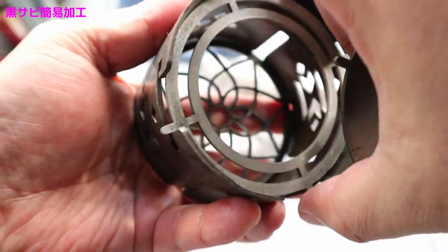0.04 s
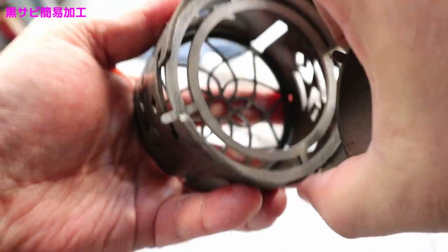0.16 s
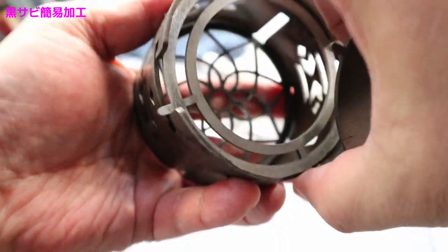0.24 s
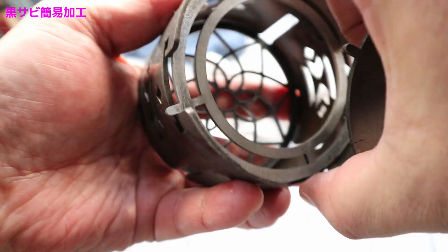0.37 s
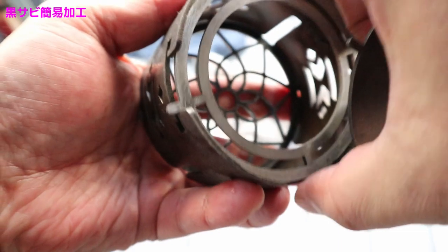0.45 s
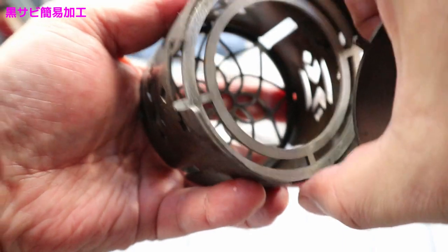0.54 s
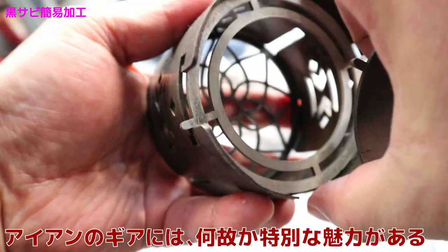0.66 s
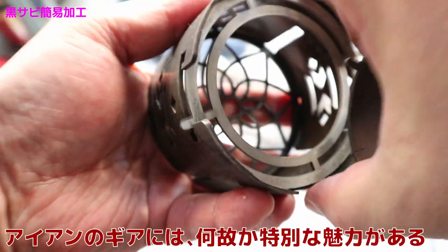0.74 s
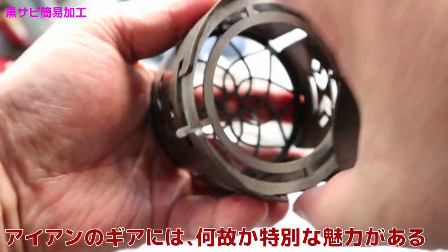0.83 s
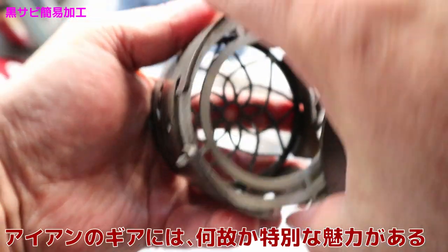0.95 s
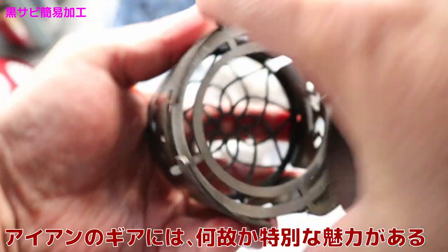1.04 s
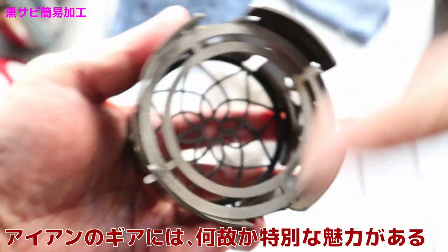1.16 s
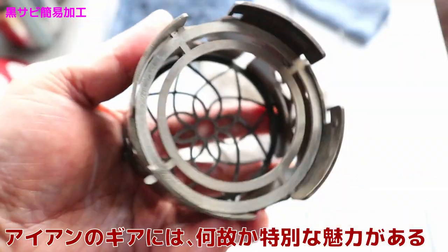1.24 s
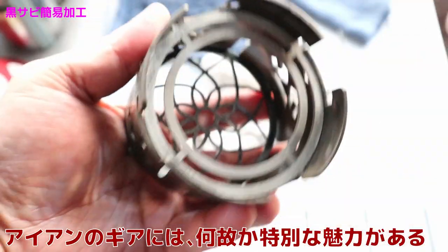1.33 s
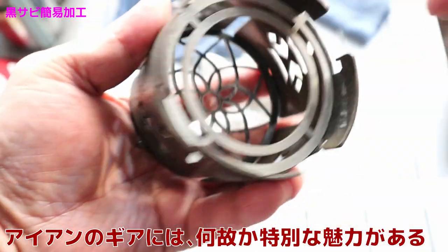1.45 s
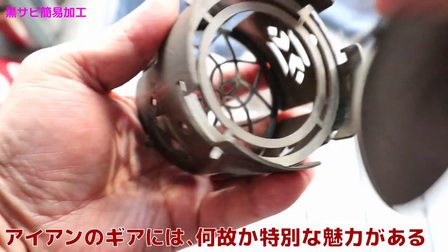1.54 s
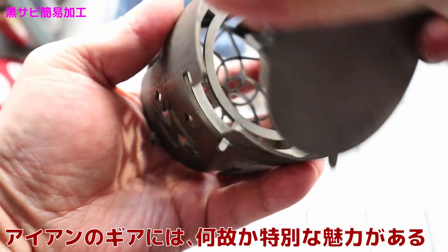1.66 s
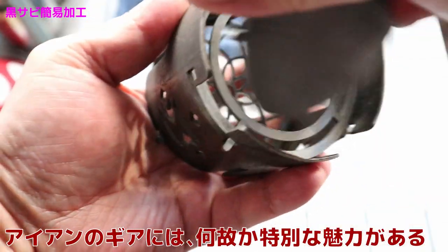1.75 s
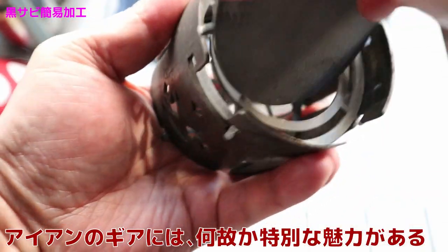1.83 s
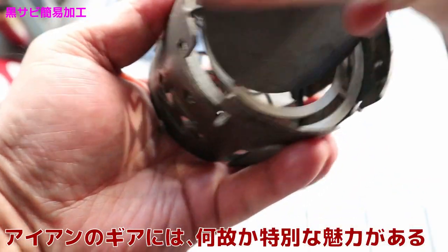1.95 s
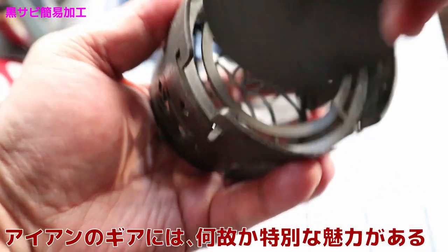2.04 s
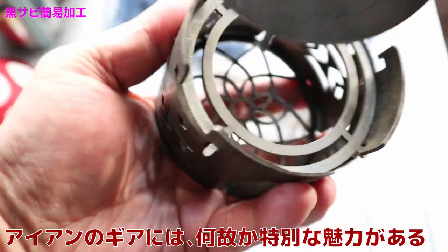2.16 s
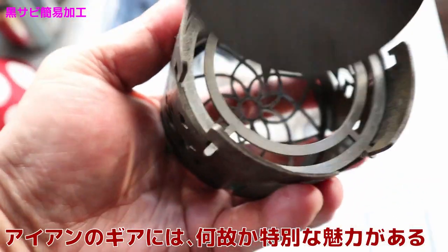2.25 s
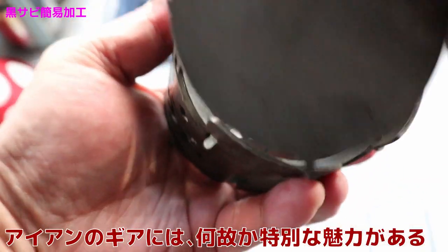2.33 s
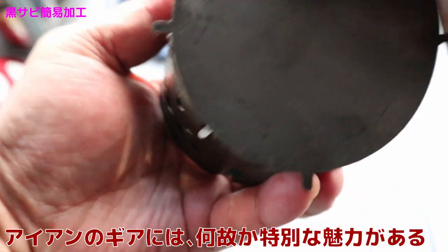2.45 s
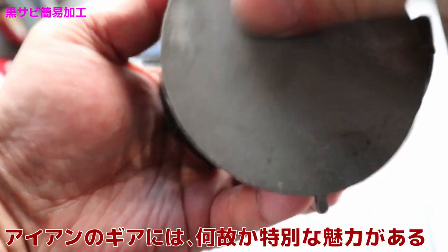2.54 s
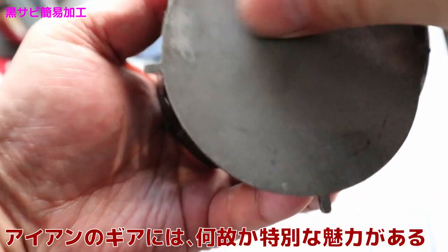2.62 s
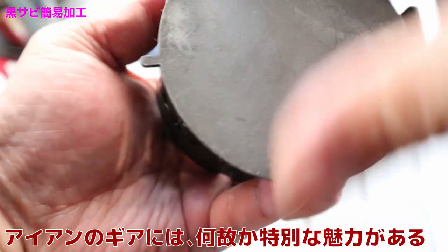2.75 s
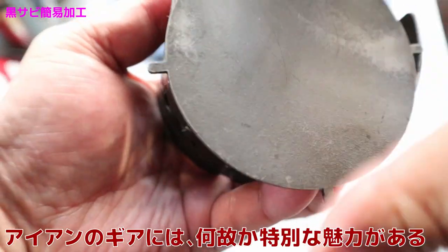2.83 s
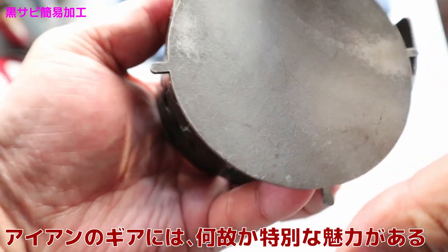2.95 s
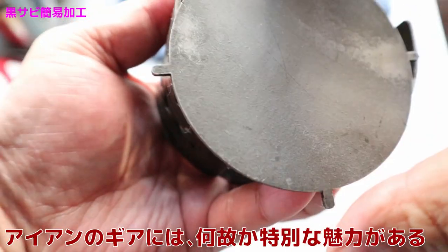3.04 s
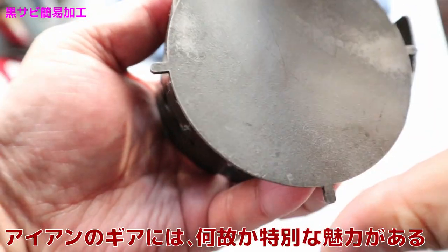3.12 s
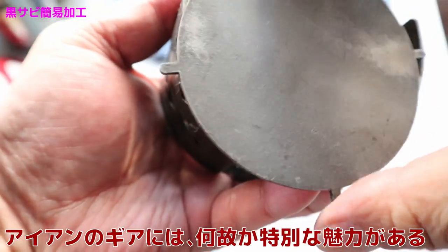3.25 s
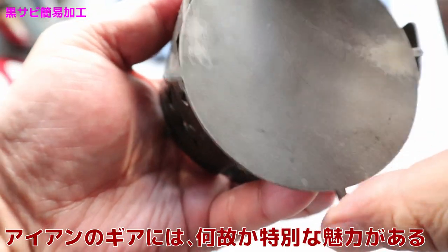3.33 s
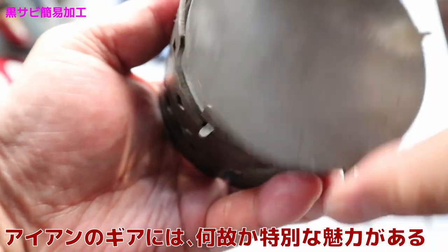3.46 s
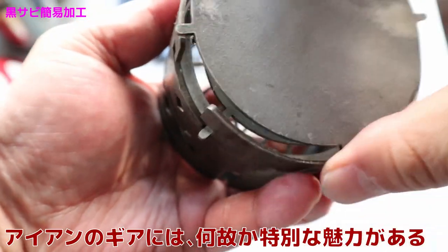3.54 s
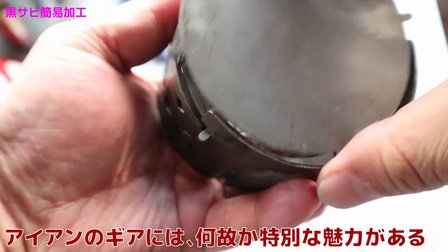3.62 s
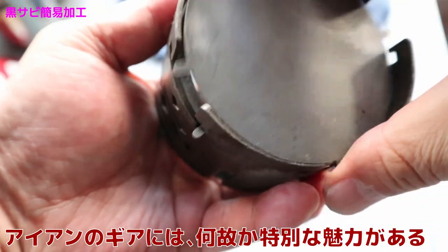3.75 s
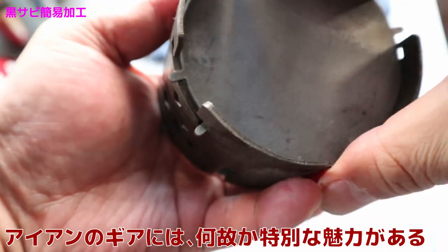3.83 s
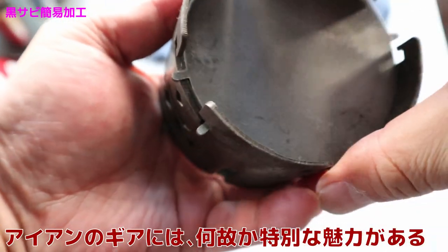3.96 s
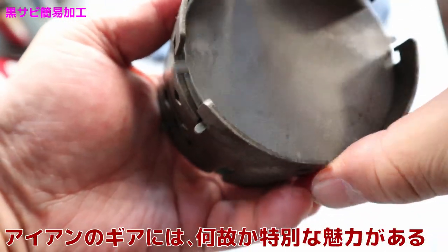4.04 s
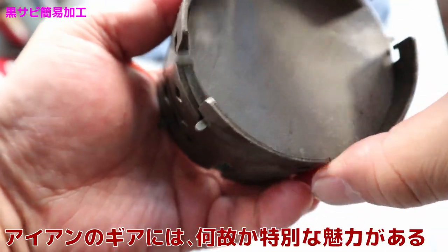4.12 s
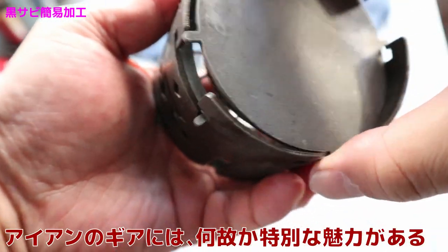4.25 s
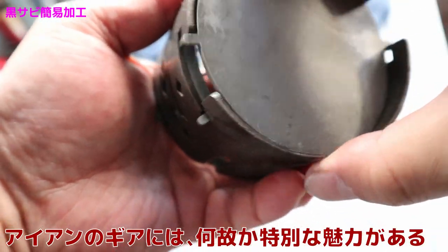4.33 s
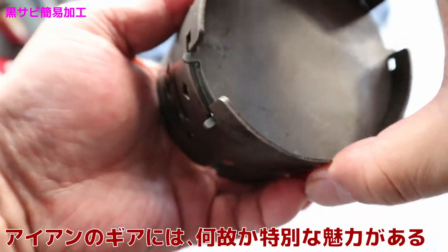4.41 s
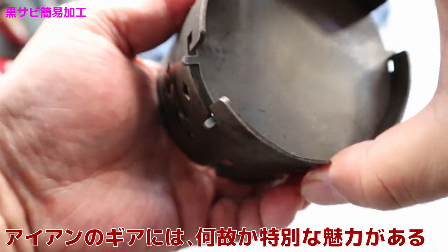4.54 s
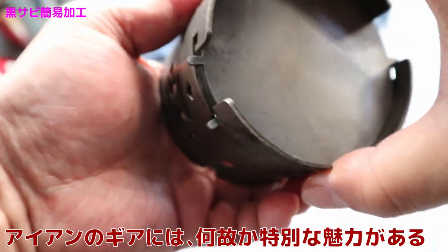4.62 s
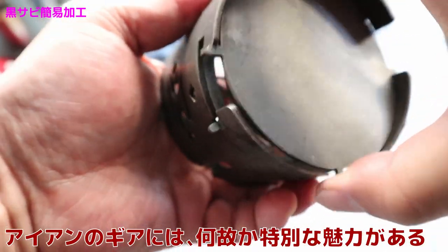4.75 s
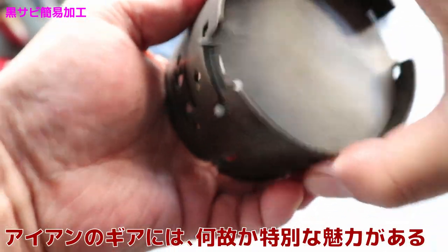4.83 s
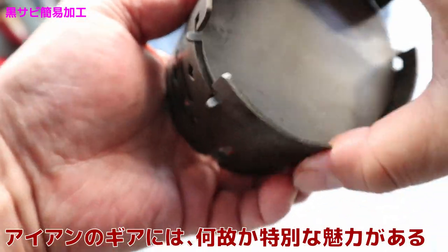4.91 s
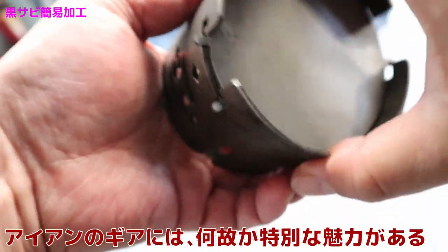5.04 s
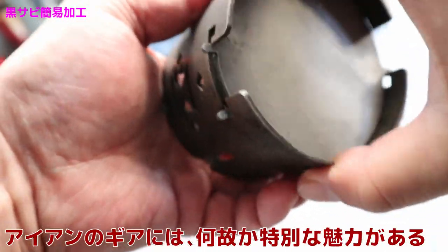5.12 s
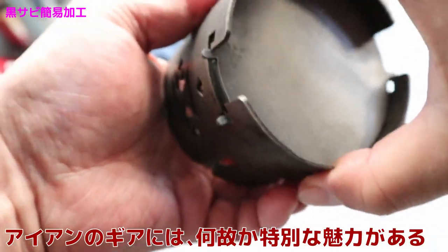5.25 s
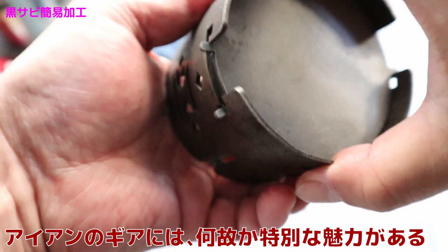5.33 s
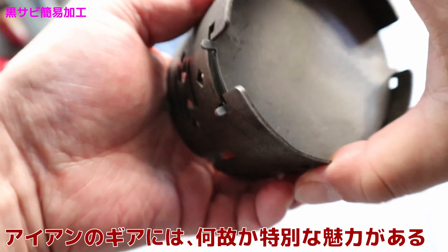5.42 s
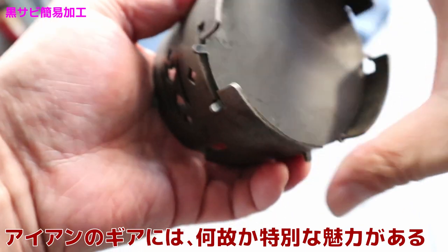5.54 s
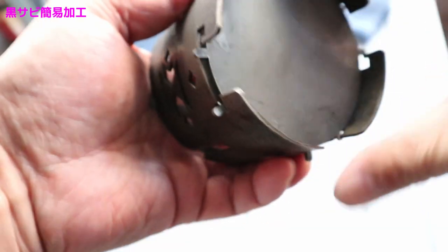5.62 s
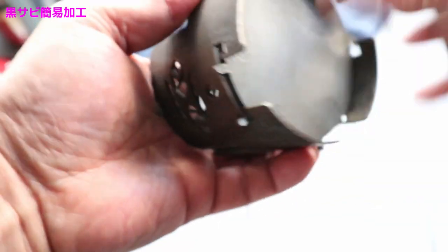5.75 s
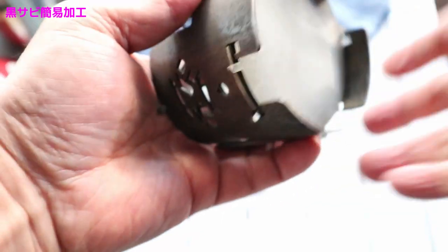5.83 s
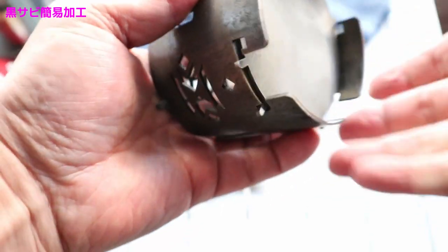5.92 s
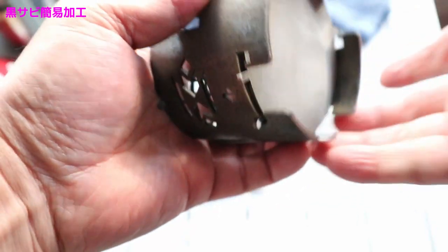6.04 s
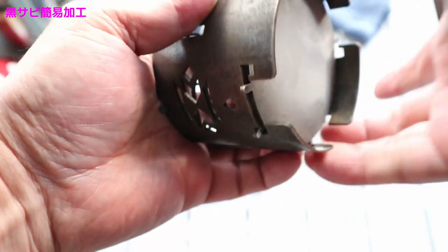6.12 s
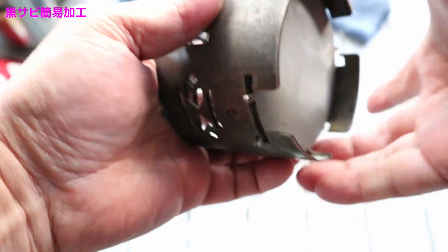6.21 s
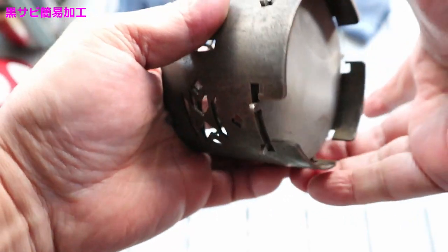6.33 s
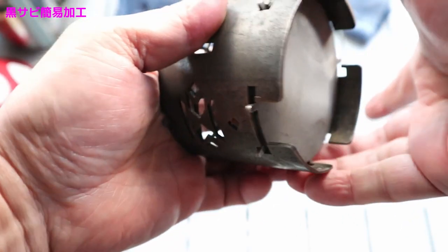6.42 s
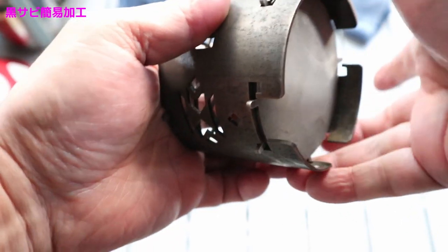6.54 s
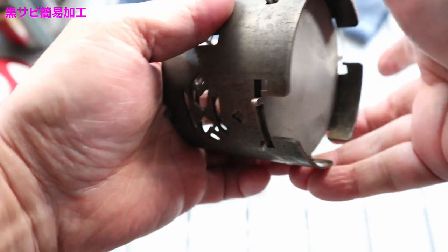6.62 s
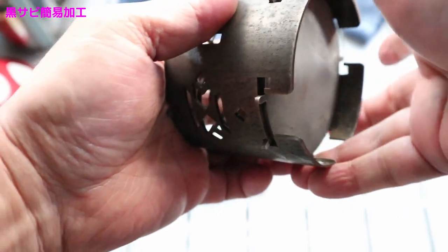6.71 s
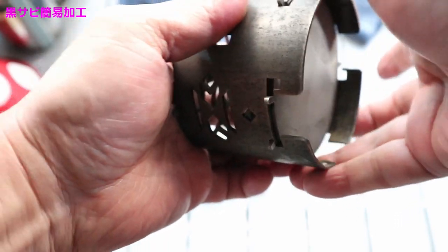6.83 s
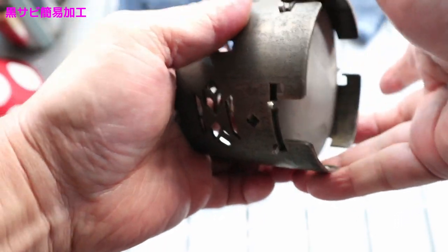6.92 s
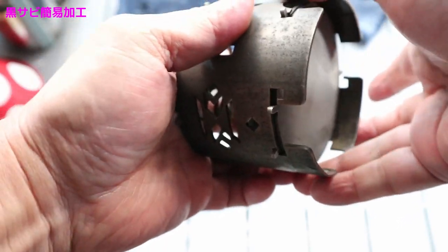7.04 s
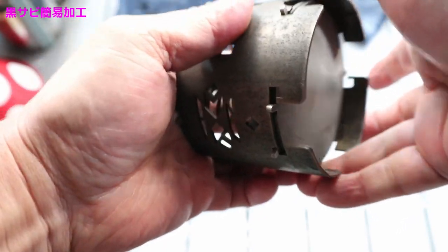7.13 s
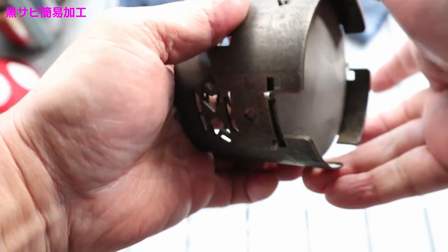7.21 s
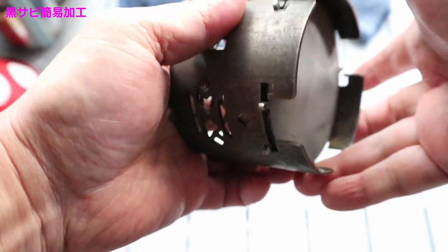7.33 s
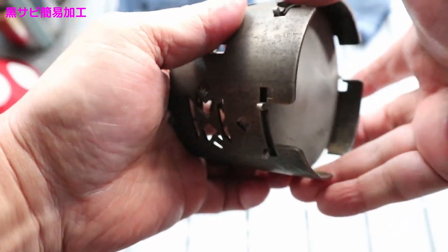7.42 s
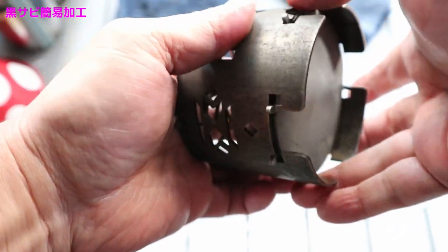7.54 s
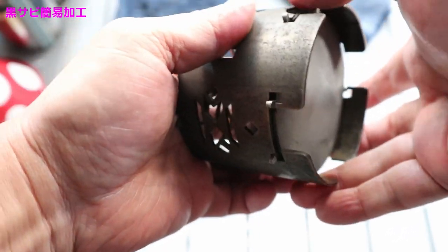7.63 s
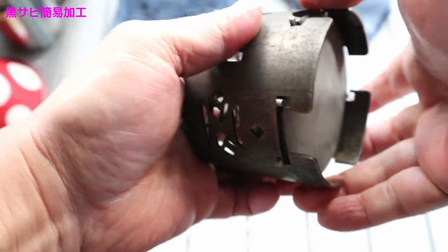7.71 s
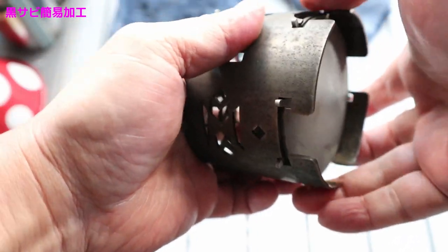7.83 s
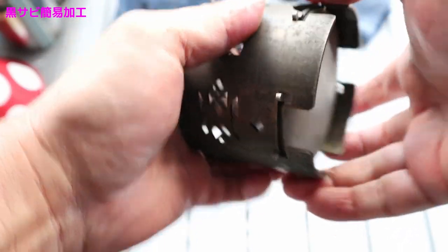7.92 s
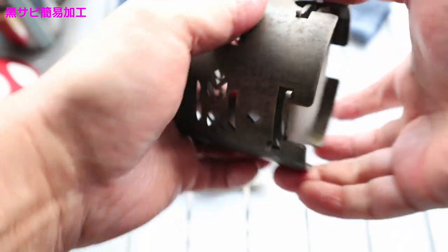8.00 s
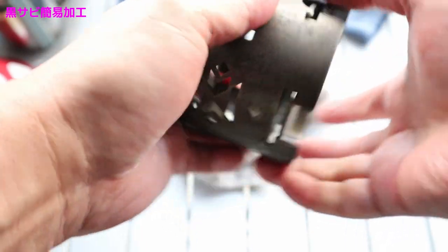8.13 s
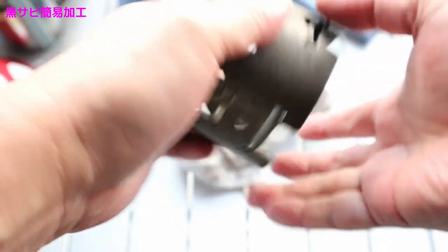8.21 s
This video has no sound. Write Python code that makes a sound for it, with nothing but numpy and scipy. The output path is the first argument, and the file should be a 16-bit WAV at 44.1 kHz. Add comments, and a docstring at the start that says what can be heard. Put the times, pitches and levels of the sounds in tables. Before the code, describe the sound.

Close stereo microphone in a small room, metal slightly right of centre. Faint gritty scraping, then a sharp bright clack as a small plate leaves an iron cylinder. A disc touches the rim with short rings, then lands in a loud double clank. Uneven ticks, knocks and little scrapes follow as it is pushed into slots, growing sparse. Steady low room noise lies underneath.

```python
"""A small room, with thin iron plates handled close to a two-port microphone, a little to its right.
A small plate is pulled off a cylindrical iron shell; then a round disc is set on the rim, drops,
and is pushed and rocked into its slots. Noise bursts shaped by the shell make knocks and scrapes.
Free plates ring briefly as dying sines; plates held by the fingers only tick and scrape.
Near echoes, a short room tail and a steady low background lie around them."""
import sys
import numpy as np
from scipy import signal
from scipy.fft import rfft, irfft, next_fast_len
from scipy.io import wavfile

SR = 44100
rng = np.random.default_rng(int(sys.argv[2]) if len(sys.argv) > 2 else 0)


def generate_wav(sig):
    """Save sig (samples, or channels by samples) to the path in sys.argv[1] as 16-bit PCM at SR."""
    pcm = np.round(np.clip(np.atleast_2d(sig).T, -1, 1) * 32767).astype(np.int16)
    wavfile.write(sys.argv[1], SR, pcm)


N = 364701

# modes of the shell's free rim, which ring along with either plate: f/Hz, level/dB, decay time/ring t60
RIM = [(1216, -22, 1.0), (1514, -10.5, .8), (1600, -9.5, 0.57), (2160, -12.5, 1.3), (2393, -11, 1.3),
       (3010, -15.5, 0.72), (3290, -12.5, 0.68), (3830, -21, 0.3), (5920, -15, 1.5)]


def amp(db):
    """Decibels to gain."""
    return 10 ** (np.asarray(db) / 20)


def unit(x):
    """Scales to rms 1."""
    return x / np.sqrt(np.mean(x ** 2) + 1e-20)


def read(points, hz):
    """Reads (f/Hz, value) points on a log-frequency axis."""
    f, value = np.transpose(points)
    return np.interp(np.log(hz + 1), np.log(f + 1), value)


def add(mix, s, sound):
    """Adds a sound at time s, or at the start if s is negative."""
    part = mix[:, max(round(s * SR), 0):][:, :sound.shape[-1]]
    part += sound[..., :part.shape[1]]


def lean(pan_db):
    """Left and right gains of equal total power, pan_db apart."""
    gains = amp([pan_db / 2, -pan_db / 2]).reshape(2, -1)
    return gains / np.sqrt((gains ** 2).mean(0))


def background(whine_hz=2740, whine_width_hz=130, whine_db=9, level_db=-52.5):
    """Steady low room noise, nearly mono in the bass, with a faint fuzzy whine."""
    # spectrum of the background: f/Hz, density/dB per Hz
    floor_spectrum = [(12, -28), (30, -9), (62, -3.5), (120, -9), (310, -12), (550, -17), (1170, -24.5),
                      (2000, -26.5), (3300, -33.5), (8160, -42), (15000, -72.5)]
    # how alike the two ports hear it: f/Hz, left-right correlation
    likeness = [(50, 1), (125, 0.89), (300, 0.47), (1000, .4), (4000, 0.068)]
    hz = np.fft.rfftfreq(N, 1 / SR)
    left, other = rfft(rng.standard_normal((2, N)))
    same = np.clip(read(likeness, hz), -1, 1)
    right = same * left + np.sqrt(1 - same ** 2) * other
    whine = whine_db / (1 + (2 * (hz - whine_hz) / whine_width_hz) ** 2)
    spectrum = np.array([left, right]) * amp(read(floor_spectrum, hz) + whine)
    return amp(level_db) * unit(irfft(spectrum, N))


def shell(force, low_db, upper_db, treble_db, point_db=2.5, ripple_hz=160, size=8192):
    """Passes a contact force through the palm-damped shell's causal response; the result has energy 1."""
    # spectrum of the shell damped by the palm: f/Hz, density/dB per Hz
    shell_spectrum = [(60, -33), (130, -24.5), (378, -8.5), (576, -18.5), (861, -6.5), (1350, -8),
                      (1730, 0.5), (2320, 0.5), (2870, -10.5), (5400, -19), (6500, -16), (9500, -17.5),
                      (12800, -30), (15500, -34)]
    # resonances that stand out of it: f/Hz, width/Hz, level/dB
    resonances = [(1485, 49, 4.4), (1630, 50, 3.2), (2100, 20, 2.5), (2520, 110, 3.6), (3006, 120, 3.9),
                  (3230, 180, 4), (5440, 120, 3.6), (9155, 260, 7.4)]
    hz = np.fft.rfftfreq(size, 1 / SR)
    tilt = [(1200, low_db), (1600, 0), (2700, 0), (3300, upper_db), (5800, upper_db), (7300, treble_db)]
    db = read(shell_spectrum, hz) + read(tilt, hz)
    for f, width, level in resonances:
        db = db + level / (1 + (2 * (hz - f) / width) ** 2)
    # every point of contact favours other resonances
    ripple = rng.standard_normal(size // 16)
    db = db + point_db * np.interp(hz / ripple_hz, np.arange(len(ripple)), ripple)
    # minimum phase: the response starts at once and rings only afterwards
    log_gain = np.log(amp(np.concatenate([db, db[-2:0:-1]])))
    response = np.fft.ifft(np.exp(np.conj(signal.hilbert(log_gain)))).real[:size // 4]
    sound = signal.fftconvolve(force, response[None], axes=1)
    return sound / np.sqrt((sound ** 2).sum() / 2)


def both_sides(force, apart=1.0, above_hz=3800):
    """The plates radiate treble unequally towards the two microphone ports."""
    other = force * rng.choice([-1, 1], len(force))
    other = apart * signal.lfilter(*signal.butter(1, min(above_hz, SR / 3), "high", fs=SR), other)
    return np.array([force + other, force - other])


def colour(db, bright_db):
    """Low, upper and treble dB: harder blows have less body; sharp edges lift upper band and treble."""
    low_db = 2.5 - 0.46 * (db + 30)  # under about 1.4 kHz, relative to a light touch at -30 dB
    upper_db = 1 + .52 * bright_db  # about 3-6.5 kHz
    return low_db, upper_db, -9 + bright_db


def contact(db, bright_db, chatter_s, first=1.0, bite_s=.0009, energy_s=0.006):
    """The edges touch, bite, and chatter on in a dying noise that shakes the shell."""
    t = np.arange(SR // 12) / SR
    chatter = np.exp(-np.log(1000) * t / max(chatter_s, .002))
    bite = 1 - np.exp(-t / bite_s)
    force = rng.standard_normal(len(t)) * chatter * bite
    force[0] = first
    # the energy is that of energy_s seconds at rms level db
    return amp(db) * np.sqrt(energy_s * SR) * shell(both_sides(force), *colour(db, bright_db))


def knock(knocks, s, db, bright_db, chatter_s):
    """The edges graze faintly just before they strike."""
    graze_lead_s, graze_db, graze_chatter_s = 0.0043, -26, .02
    add(knocks, s - graze_lead_s, contact(db + graze_db, bright_db, graze_chatter_s))
    add(knocks, s, contact(db, bright_db, chatter_s))


def damped(hz, db, t60, wobble_hz=0, length_s=.1, steps_per_s=250):
    """A dying sine that starts at rms level db; rattling against a neighbour makes its pitch wobble."""
    t = np.arange(round(length_s * SR)) / SR
    steps = rng.standard_normal(size=256)
    rattle = np.interp(t * steps_per_s, np.arange(len(steps)), steps)
    turns = hz * t + wobble_hz * np.cumsum(rattle) / SR
    return np.sqrt(2) * amp(db) * np.exp(-np.log(1000) * t / t60) * np.sin(2 * np.pi * turns)


def ring(s, ring_db, high_db, t60, lead_hz=None, scatter_db=1.0, free_t60=.24, stiffen=.0035, rattle=.0075):
    """Modes of plate and rim ring, one may lead; rings shorter than free_t60 are pressed, sharp and blurred."""
    # modes of the small plate: f/Hz, level/dB, decay time/ring t60
    small_plate = [(1520, -12, 0.59), (2000, -10, 2), (2160, -3, 1.9), (2930, 2, 0.77), (3120, 1.5, 0.81),
                   (3470, -2.5, 0.61), (4700, -13, 0.66), (5540, -12, 1.3), (5770, -5, 0.84),
                   (7260, -11.5, 1.6), (6960, -10, .9), (8740, -13.5, 0.92), (9534, -25, .85),
                   (10200, -12, 1.4), (11570, -12, 1.4), (13230, -14.5, 1.2), (15080, -16.5, .7)]
    # modes of the round disc: f/Hz, level/dB, decay time/ring t60
    disc = [(2017, -15, 0.63), (2376, 1.5, 0.79), (2383, -9.5, 0.97), (3390, -16.5, 2.2),
            (4480, -20.5, 1.6), (5452, -2, 1.22), (5490, -16, 0.53), (5830, -23.5, 1.2), (8760, -19, 2.6),
            (8800, -19.5, .8), (9760, -18, 1.3), (10400, -25.5, 1.0), (11900, -30.5, 1.2), (12700, -36, .9)]
    disc_from_s, high_modes_hz, other_modes_db = 1.6, 4000, -13.5
    plate = small_plate if s < disc_from_s else disc
    hz, db, hold = np.transpose(np.concatenate([plate, RIM]))
    db = db + other_modes_db + high_db * (hz > high_modes_hz)
    db = db + scatter_db * rng.standard_normal(len(hz))
    if lead_hz:
        db[np.argmin(abs(hz - lead_hz))] = 0
    # stiffen and rattle are shares of each mode's pitch
    pressed = max(free_t60 / t60 - 1, 0)
    hz = hz * (1 + stiffen * pressed * rng.uniform(0, 1.5, len(hz)))
    return sum(damped(f, ring_db + d, t60 * h, f * rattle * pressed, 2 * t60) for f, d, h in zip(hz, db, hold))


def clinks(knocks, rings):
    """Loosely held plates knock and ring on, led by the mode that the point of contact favours; the first row
    is only a faint knock and ring already sounding as the scene opens."""
    # clinks: t/s, level/dB, brightness/dB, chatter t60/s, ring level/dB, base ring t60/s, leading mode f/Hz
    clink_list = [(0.0, -44.5, 11, 0.075, -54.5, 0.23, 3140), (0.506, -44, 0, 0.046, -58.5, 0.34, 2160),
                  (0.822, -49, 16, 0.027, -38.5, 0.11, 2160), (0.93, -54, -7.5, 0.021, -46, 0.058, 1225),
                  (1.0, -14, 15.5, 0.06, -18.5, 0.11, 3320), (1.139, -34, 25, .04, -42.5, 0.31, 4600),
                  (1.413, -61, 18, .03, -59.5, 0.24, 3320), (1.519, -67, 9, .03, -61, 0.23, 5630),
                  (1.77, -21.5, -1.5, 0.026, -27, .24, 2402), (1.863, -24.5, 10, 0.1, -31.5, 0.13, 2376),
                  (2.053, -32, 8, 0.046, -25, .14, 2440), (2.083, -33.5, 3.5, .045, -24, .14, 2387),
                  (2.316, -52, -1, .03, -40, .25, 2360), (2.415, -56, 4.5, .03, -60, 0.21, 2420),
                  (2.5, -13.5, 2, 0.031, -1, 0.062, 2344), (2.513, -21.5, -11.5, 0.024, -20, 0.22, 2355),
                  (2.606, -9.5, 5, 0.029, -8, 0.077, 2353), (2.609, -16, 2, 0.033, -8, 0.077, 1595),
                  (2.612, -8.5, 10, 0.023, -7, 0.062, 5493), (2.671, -44, -3.5, 0.029, -34, 0.061, 5500),
                  (2.96, -28, -1, 0.0072, -46, .15, 5440), (3.209, -17.5, 5.5, 0.038, -25.5, .09, 5450),
                  (3.427, -33, -6.5, 0.014, -34, 0.26, 2017), (3.44, -44, -6, 0.023, -42, 0.25, 5456),
                  (3.626, -41.5, 1.5, 0.02, -29, 0.22, 2382), (3.668, -35.5, -1, 0.013, -47, .25, 3328),
                  (3.725, -33.5, -4.5, .018, -23, 0.082, 2426), (3.776, -11.5, 9, 0.024, -4.5, 0.12, 2383),
                  (3.785, -13.5, 1, 0.028, -13, 0.19, 5455), (3.808, -22.5, 7, .03, -17.5, 0.043, 2017),
                  (3.873, -37.5, -7.5, 0.04, -34.5, 0.13, 2380),
                  (3.975, -27.5, -19, 0.1, -28.5, 0.12, 2470),
                  (4.298, -27, -5.5, 0.047, -25.5, 0.096, 2017),
                  (4.448, -18, 2.5, 0.012, -13.5, 0.043, 2420), (5.566, -21, -5, .024, -17, 0.14, 2320),
                  (5.572, -10, 8.5, 0.045, -8, 0.072, 2430), (5.576, -24, 18.5, .02, -20, 0.069, 8880),
                  (5.581, -26, 16, 0.018, -18, 0.067, 5470), (5.859, -49, 10, 0.04, -54, 0.25, 2017),
                  (7.011, -22, -1.5, 0.0091, -29.5, 0.11, 1225), (7.245, -18.5, 1, 0.024, -20, 0.079, 2420),
                  (7.37, -33.5, -5, .027, -36, 0.4, 2362), (7.384, -23, 6, 0.016, -26.5, 0.037, 3410),
                  (7.403, -44, 4, .015, -32, 0.12, 5470), (7.493, -20.5, -2.5, 0.014, -31, 0.16, 2017),
                  (8.017, -18.5, 4, .021, -22.5, 0.053, 2160)]
    high_per_brightness = 0.39  # lift of the high modes, dB per dB
    for s, db, bright_db, chatter_s, ring_db, t60, lead_hz in clink_list:
        knock(knocks, s, db, bright_db, chatter_s)
        add(rings, s, ring(s, ring_db, high_per_brightness * bright_db, t60, lead_hz))


def near_echoes(x, count=20, first_s=.003, last_s=.024):
    """Single reflections from the hands and the surfaces around them, weaker with distance."""
    out = np.zeros((2, N))
    for side in (0, 1):
        delays = np.geomspace(first_s, last_s, count) * rng.uniform(0.78, 1.15, count)
        sizes = unit(delays ** -.4) / np.sqrt(count) * rng.choice([-1, 1], count)
        for delay, size in zip(delays, sizes):
            lag = max(round(delay * SR), 1)
            out[side, lag:] += size * x[side, :-lag]
    return out


def room(x, onset_s=.007):
    """Dense reflections of random sign; each band dies at its own speed."""
    # decay of the small room: f/Hz, t60/s
    room_decay = [(150, 0.47), (800, 0.51), (2100, 0.24), (5500, 0.26), (10000, 0.29), (15000, 0.14)]
    taps = rng.standard_normal((2, SR // 2)) * (rng.random((2, SR // 2)) < 4000 / SR)
    hz, t, z = signal.stft(taps, SR, nperseg=256)
    fade = np.exp(-np.log(1000) * t / read(room_decay, hz)[:, None])
    onset = 1 - np.exp(-(t / onset_s) ** 2)
    tail = signal.istft(z * fade * onset, SR, nperseg=256)[1]
    return signal.fftconvolve(x, tail / np.linalg.norm(tail[0]), axes=1)[:, :N]


def ticks(knocks, rings):
    """Firmly held plates only tick; each tick sets one rim mode ringing, choked by the fingers."""
    # ticks: t/s, level/dB, brightness/dB, chatter t60/s
    tick_list = [(0.551, -46.5, 7, .01), (0.628, -32, 14.5, .013), (0.674, -31, 17, .011),
                 (0.695, -42.5, 11.5, .03), (0.711, -34, 7.5, .035), (0.811, -36, 22, .04),
                 (1.944, -44, 0, .014), (2.58, -28, -13, .04), (2.601, -11, 0, .045), (2.618, -13, 4, .014),
                 (2.916, -48.5, -15.5, .03), (3.044, -41.5, -7, .022), (3.108, -51, -10, .018),
                 (3.197, -17.5, -4.5, .019), (3.331, -41, -3, .016), (3.39, -39.5, -6, .04),
                 (3.708, -33, -1.5, .08), (3.735, -21, -1, .022), (3.802, -25, 3.5, .03),
                 (4.065, -39.5, -12.5, .05), (4.147, -33, -5, .013), (4.171, -35.5, -8, .019),
                 (4.213, -31, -7, .04), (4.235, -34.5, -7.5, .009), (4.396, -31.5, -10, .011),
                 (4.419, -29.5, -2, .017), (4.43, -27, 4, .025), (4.443, -27, 0.5, .02),
                 (4.516, -29.5, -8, .015), (4.747, -32.5, 3, .009), (4.77, -25.5, -5.5, .02),
                 (4.887, -23.5, -11, .014), (4.901, -24.5, 11.5, .014), (4.932, -20.5, -8, .012),
                 (4.943, -30.5, -10, .016), (4.97, -31.5, -12, .013), (5.187, -29, -4, .014),
                 (5.28, -44.5, -9, .016), (5.321, -38.5, -17.5, .01), (5.487, -31.5, -12, .016),
                 (5.509, -33, 3, .014), (5.557, -36.5, -1.5, .04), (5.587, -25.5, 13, .015),
                 (6.109, -30, 10.5, .05), (6.443, -33.5, 0.5, .013), (6.493, -51, -8, .014),
                 (7.142, -50.5, 1, .02), (7.39, -30, 5, .02), (7.487, -32.5, 1, .009),
                 (7.613, -37, -3.5, .027), (7.723, -42.5, 1, .035), (7.753, -33.5, -9, .022),
                 (7.871, -36.5, -5.5, .008), (8.009, -34.5, -3.5, .05), (8.041, -28, 0, .01),
                 (8.064, -24, 3, .025), (8.07, -14.5, 9.5, .022), (8.246, -41.5, 4.5, .027)]
    ring_db, ring_t60 = -14.5, 0.055  # dB against the tick, s
    for s, db, bright_db, chatter_s in tick_list:
        knock(knocks, s, db, bright_db, chatter_s)
        rim_hz = RIM[rng.integers(len(RIM))][0]
        add(rings, s, damped(rim_hz, db + ring_db, ring_t60))


def scrape(start, end, db, low_db, upper_db, treble_db,
           slips_per_s=380, spread_db=3.0, slip_s=0.00095, drag=0.28, ring_db=-9):
    """Edges catch and slip at uneven moments; each slip shakes the shell and the plate."""
    count = max(round((end - start) * SR), 256)
    sizes = amp(spread_db * np.minimum(rng.exponential(1, count), 2))
    slips = (rng.random(count) < slips_per_s / SR) * sizes
    pressure = drag + signal.lfilter([1], [1, -np.exp(-1 / (slip_s * SR))], slips)
    force = pressure * rng.standard_normal(count) * signal.windows.tukey(count, .35)
    rub = shell(both_sides(force), low_db, upper_db, treble_db)
    sing = signal.fftconvolve(force, ring(start, 0, treble_db - 9, 0.086))
    sound = np.tile(amp(ring_db) * sing / np.linalg.norm(sing), (2, 1))
    sound[:, :rub.shape[1]] += rub
    return amp(db) * np.sqrt(count) * sound


def scrapes(knocks):
    """Edges slide on each other, with the same low body whatever the level."""
    # scrapes: start t/s, end t/s, level/dB, brightness/dB
    scrape_list = [(0.608, 0.667, -50, 9), (0.678, 0.744, -41, 12), (0.798, 0.842, -42.5, 11),
                   (0.971, 1.028, -45, -3), (1.117, 1.189, -37.5, 24.5), (1.381, 1.435, -62, 18),
                   (1.492, 1.574, -65.5, 17), (1.863, 1.964, -46, 10), (2.023, 2.116, -32, 8),
                   (2.574, 2.601, -28, -5), (3.374, 3.451, -40.5, -7), (3.661, 3.724, -41, -11),
                   (3.709, 3.763, -33, -11), (3.871, 3.912, -44.5, -9), (3.965, 4.005, -35, 8),
                   (4.073, 4.119, -48, -6), (4.188, 4.248, -39, -7), (4.28, 4.355, -49.5, -3),
                   (4.405, 4.463, -37, -2), (4.768, 4.813, -38, -8), (4.869, 4.909, -38.5, -7),
                   (5.548, 5.569, -38, -19), (6.099, 6.13, -40, 14.5), (6.429, 6.456, -46.5, -1.5),
                   (7.371, 7.418, -37.5, 5), (7.522, 7.574, -47.5, -11), (7.74, 7.778, -43.5, 0),
                   (8.023, 8.085, -37.5, 3)]
    for start, end, db, bright_db in scrape_list:
        _, upper_db, treble_db = colour(db, bright_db)
        add(knocks, start, scrape(start, end, db, -1.5, upper_db, treble_db))


def grip(low_hz=80, high_hz=135):
    """A soft rumble swells and fades once as the hands shift their grip."""
    peak_s, level_db, rise_s, fall_s = 1.825, -45.5, 0.13, 0.35  # level_db before the swell
    band = signal.butter(2, [low_hz, high_hz], "band", fs=SR, output="sos")
    rumble = signal.sosfilt(band, rng.standard_normal(N))
    swell = np.interp(np.arange(N) / SR, [peak_s - rise_s, peak_s, peak_s + fall_s], [0, 1, 0])
    return amp(level_db) * swell * unit(rumble)


def microphones(x):
    """Two close ports hear the near sound louder on the right above the bass and slightly out of phase."""
    # balance of the near sound: f/Hz, left-right level/dB
    balance = [(150, 0), (700, -2.5), (1900, -7.5), (2400, -9), (4500, -6.5), (12000, -4)]
    # phase by which the left port leads: f/Hz, phase/rad
    left_leads = [(100, 0.22), (500, .7), (1300, 0.8), (2000, -0.44), (2400, 0.39), (3500, .8),
                  (5500, -0.33), (8000, 0.6), (15000, 0.092)]
    size = next_fast_len(N + SR // 10)
    hz = np.fft.rfftfreq(size, 1 / SR)
    phase = read(left_leads, hz) * np.array([[1], [0]])
    ports = lean(read(balance, hz)) * np.exp(1j * phase)
    return irfft(rfft(x, size) * ports, size)[:, :N]


def scene():
    """Ticks, clinks and scrapes from one spot a little to the right, with their room."""
    knocks, rings = np.zeros((2, 2, N))
    clinks(knocks, rings)
    ticks(knocks, rings)
    scrapes(knocks)
    early_db, knock_room_db, ring_room_db, room_pan_db = -6.5, -13, -16.5, -3
    direct = microphones(knocks + rings + amp(early_db) * near_echoes(knocks))
    reverb = lean(room_pan_db) * room(amp(knock_room_db) * knocks + amp(ring_room_db) * rings)
    return direct + reverb + background() + grip()


def record(dry, ceiling=0.99):
    """The hardest blows overload softly towards the ceiling; then a low-pass limits the band."""
    squeezed = dry / (1 + (dry / ceiling) ** 4) ** (1 / 4)
    low_pass = signal.firwin(401, 15700, window=("kaiser", 9), fs=SR)  # cutoff in Hz
    return signal.oaconvolve(squeezed, low_pass[None], "same", axes=1)


dry = scene()
out = record(dry)
generate_wav(out)
```